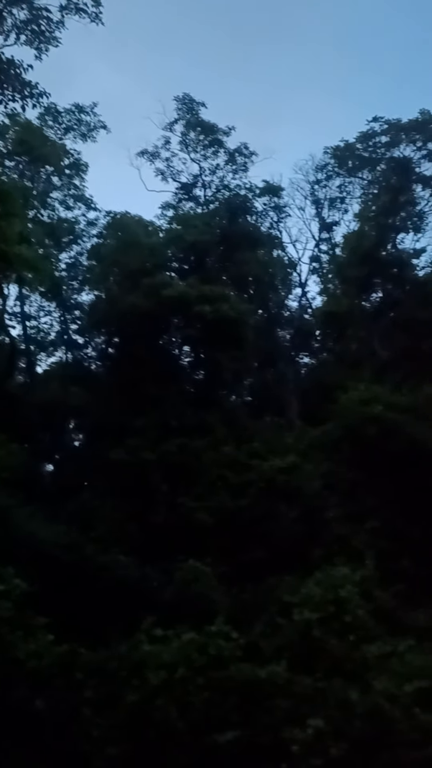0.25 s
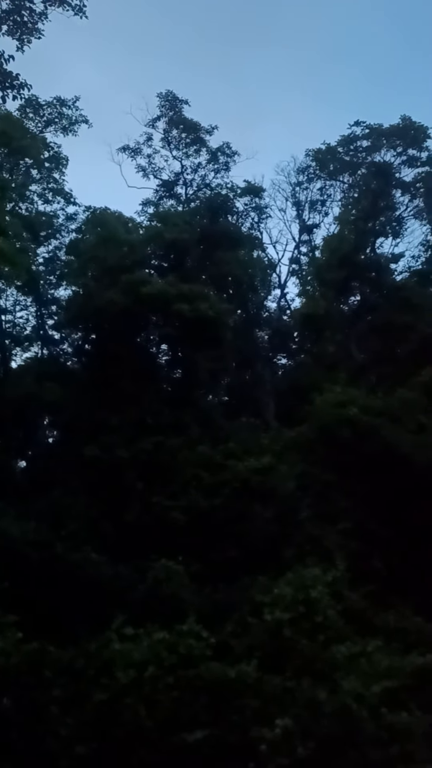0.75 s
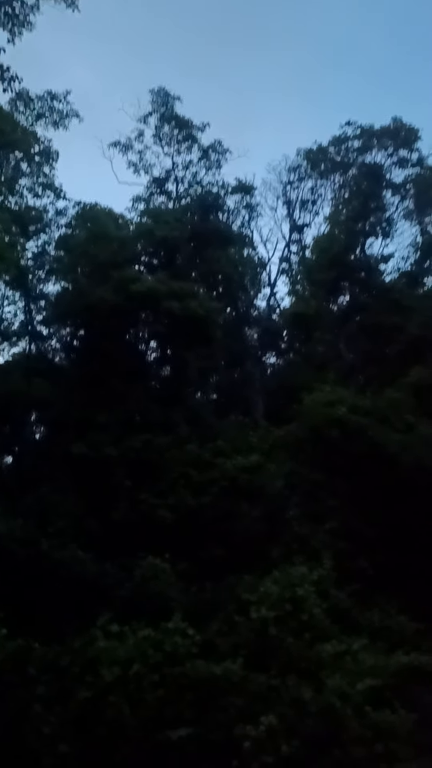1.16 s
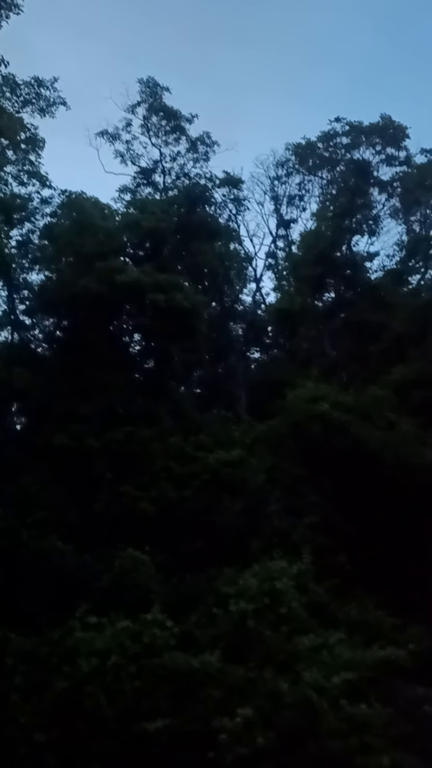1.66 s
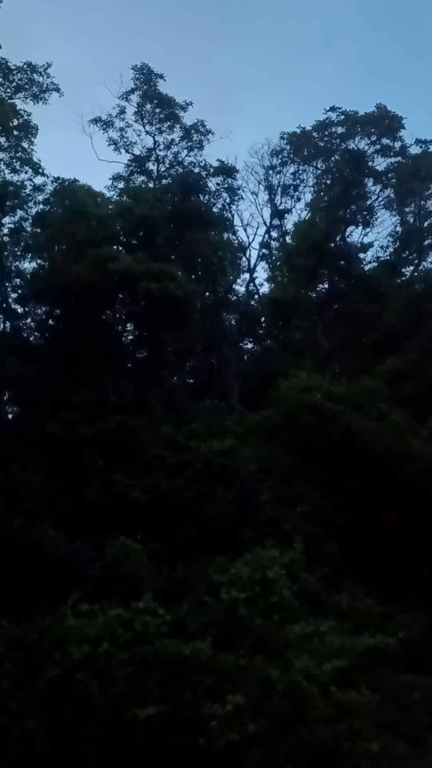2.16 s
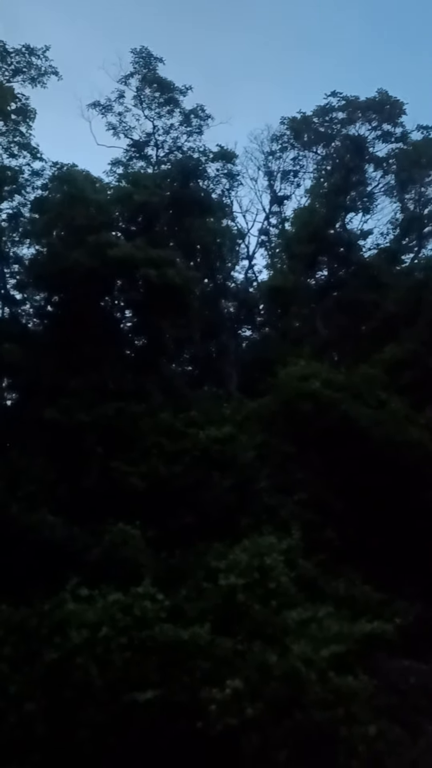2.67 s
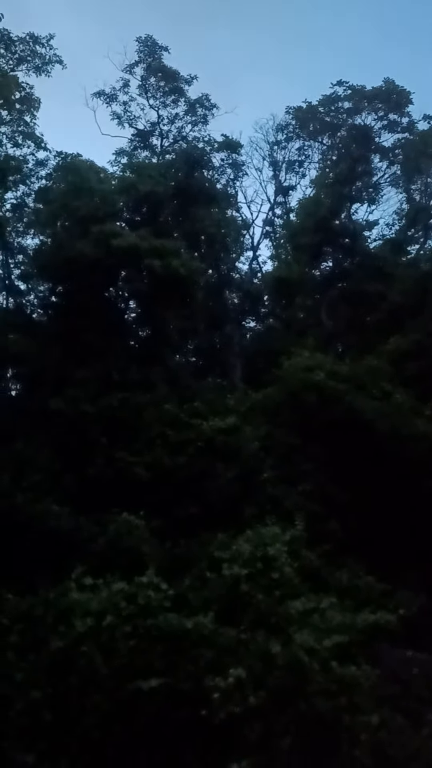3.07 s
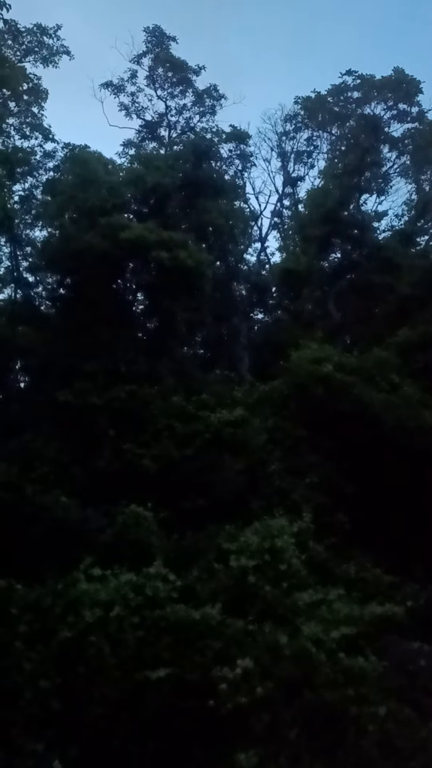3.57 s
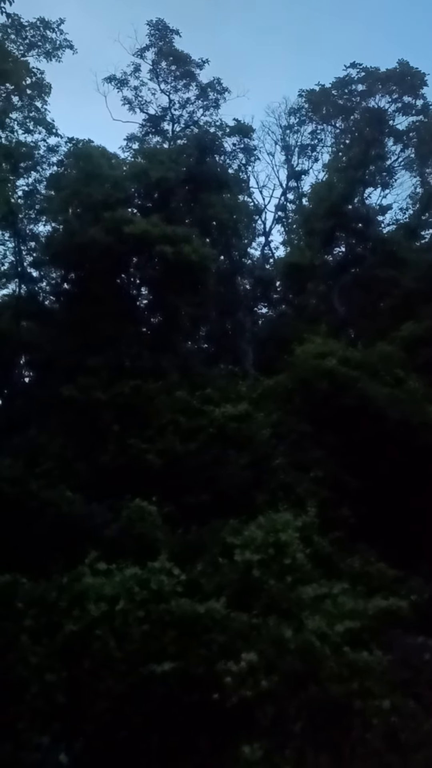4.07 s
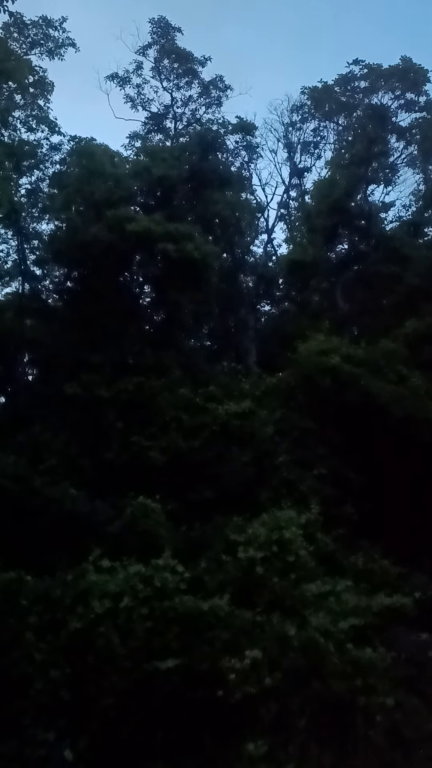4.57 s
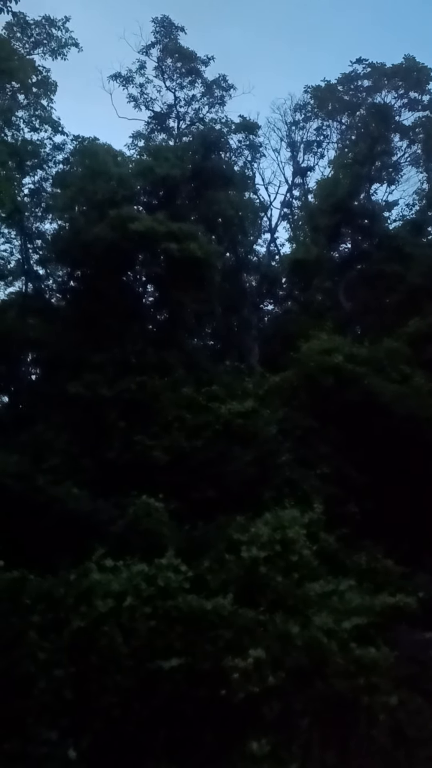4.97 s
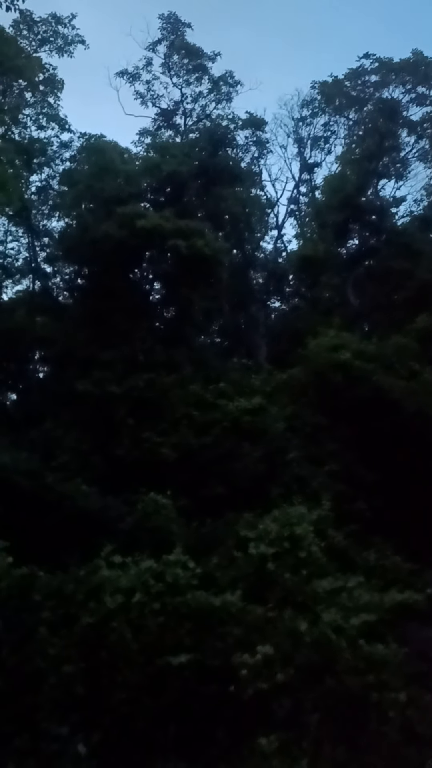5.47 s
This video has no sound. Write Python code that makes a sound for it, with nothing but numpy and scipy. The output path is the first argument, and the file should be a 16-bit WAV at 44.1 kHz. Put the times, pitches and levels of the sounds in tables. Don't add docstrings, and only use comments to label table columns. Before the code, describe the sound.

A handheld phone in a quiet twilight wood picks up weak frog trills, a steady high insect band and distant road rumble. A nightjar sings two brisk phrases, each a throaty chuck, a swooping whistle, a tiny tick and another swoop, about two seconds apart. Trees return a diffuse echo, and the quiet background continues to the end.

```python
import sys
import numpy as np
from scipy import signal
from scipy.fft import rfft, irfft, next_fast_len
from scipy.io import wavfile
from scipy.ndimage import uniform_filter1d, map_coordinates

SR = 44100
rng = np.random.default_rng(int(sys.argv[2]) if len(sys.argv) > 2 else 0)


def unload_wav(signal):
    wavfile.write(
        sys.argv[1],
        SR,
        np.round(np.clip(np.atleast_2d(signal).T, -1, 1) * 32767).astype(np.int16),
    )


def magnitude_from_level(level_db):
    exponent = np.asarray(level_db, float) / 20
    return 10 ** exponent


N = 252687
LEAD_S = 1


def unit(x):
    return x / np.sqrt(np.mean(x ** 2) + 1e-20)


def along(points, hz, axis=1):
    rows = np.array(points)
    return np.interp(np.log(hz + 1), np.log(rows[:, 0] + 1), rows[:, axis])


def curves(rows):
    s, *cols = np.transpose(rows)
    return [np.interp(np.arange(N) / SR, s, c) for c in cols]


def wobble(rate):
    return map_coordinates(rng.standard_normal(int(N * rate / SR) + 4), [np.arange(N) * rate / SR])


def filtered(x, response):
    m = next_fast_len(x.shape[-1] + 8192)
    hz = np.fft.rfftfreq(m, 1 / SR)
    return irfft(rfft(x, m) * response(hz), m)[..., :x.shape[-1]]


def noise(spectrum, channels):
    closed = [(1, -120)] + list(spectrum) + [(spectrum[-1][0] * 1.15, -70)]
    white = rng.standard_normal((channels, N))
    return unit(filtered(white, lambda hz: magnitude_from_level(along(closed, hz))))


# t/s, f/Hz, level/dB
CHUCK_NOTE = [
    (2.2935, 2390, -56),
    (2.2965, 2270, -41),
    (2.305, 1952, -37.5),
    (2.315, 1660, -33),
    (2.324, 1320, -40),
    (2.333, 1150, -58),
]
# t/s, f/Hz, level/dB
WILL_NOTE = [
    (2.604, 1192, -47),
    (2.701, 2335, -36.5),
    (2.738, 1215, -34.5),
    (2.776, 1760, -19),
    (2.797, 1500, -28),
    (2.823, 1615, -26),
    (2.858, 1165, -37),
]
# t/s, f/Hz, level/dB
TICK_NOTE = [
    (2.924, 1257, -55.5),
    (2.93, 1253, -35),
    (2.941, 1227, -30.5),
    (2.948, 1169, -35),
    (2.955, 1137, -55),
]
# t/s, f/Hz, level/dB
WIDOW_NOTE = [
    (2.994, 1138, -38),
    (3.091, 2340, -35.5),
    (3.119, 1325, -32),
    (3.144, 1790, -28),
    (3.171, 1175, -35),
    (3.19, 1120, -34.5),
    (3.207, 925, -48),
    (3.232, 990, -48),
]
# delay t/s, tempo stretch, pitch factor, level/dB
SUNG_PHRASES = [
    (-3.25, 1.007, 1.001, 1.3),
    (0.0, 1.0001, 1.0001, -0.35),
    (2.058, .989, 1.002, -1),
]
# f/Hz, level/dB
THROAT_COLOUR = [(800, -2.5), (1100, 0.04), (2500, 0.13), (3400, -19), (4600, 2.5), (5300, 1), (6800, -5),
                 (8300, -9.5), (10500, -3.5), (13000, -9), (15500, -12)]
# delay t/s, level/dB
TRUNK_ECHOES = [
    (.006, -11.5),
    (.013, -14.5),
    (.023, -14),
    (.034, -15),
]


def nightjar():
    notes = (CHUCK_NOTE, warble(WILL_NOTE, creep=.08), TICK_NOTE, warble(WIDOW_NOTE, creep=.3))
    chuck_scatter_db = 3.5
    total = 0
    for delay, stretch, factor, db in SUNG_PHRASES:
        voiced = []
        for note in notes:
            tone = magnitude_from_level(db) * whistle(note, delay, stretch, factor, brighter_db=12.5, air_db=-24)
            voiced.append(filtered(tone, lambda hz: magnitude_from_level(along(THROAT_COLOUR, hz))))
        chuck, others = voiced[0], sum(voiced[1:])
        song = chuck + others
        spread = magnitude_from_level(chuck_scatter_db) * chuck + others
        sides = rng.normal(0, 3, (len(TRUNK_ECHOES), 2, 1))
        early = sum(magnitude_from_level(level + side) * np.roll(song, round(lag * SR))
                    for (lag, level), side in zip(TRUNK_ECHOES, sides))
        late = magnitude_from_level(-5.5) * echoes(spread, alike=.5, slower=2.68, late_db=-21)
        total = total + song + early + late
    return total[:, LEAD_S * SR:]


def warble(turns, creep):
    climb_power, swell_peak_db, swell_share, swell_ends = 4.0, 9.5, .25, 11.0
    attack_s, release_s, edge_db = .009, .01, -20
    s, hz, db = np.transpose(turns)
    t = np.arange(s[0], s[-1], 1 / 1000)
    place = np.interp(t, s, np.arange(len(s)))
    leg, u = place.astype(int), place % 1
    climbing = leg == 0
    climb = creep * u + (1 - creep) * u ** climb_power
    swing = np.sin(np.pi * u ** .85 / 2) ** 2
    eased = np.where(climbing, climb, swing)
    pitch = hz[leg] + np.diff(hz)[leg] * eased
    swell_db = swell_peak_db * climbing * (1 - np.exp(-u / swell_share)) * (1 - u ** swell_ends)
    edge = np.minimum((t - s[0]) / attack_s, (s[-1] - t) / release_s).clip(0, 1)
    level = db[leg] + np.diff(db)[leg] * np.where(climbing, u, eased) + swell_db + edge_db * (1 - edge)
    return np.transpose([t, pitch, level])


# multiple, level/dB at the top of a glide
WHISTLE_OVERTONES = [(2, -30), (3, -30), (4, -40.5), (5, -40), (6, -44), (7, -45)]


def whistle(note, delay, stretch, factor, brighter_db, air_db):
    s, hz, db = np.transpose(note)
    origin = CHUCK_NOTE[0][0]
    s = LEAD_S + delay + origin + (s - origin) * stretch
    out = np.zeros(N + LEAD_S * SR)
    if s[0] < 0:
        return out
    i = np.arange(round(s[0] * SR), round(s[-1] * SR))
    pitch = uniform_filter1d(np.interp(i / SR, s, hz * factor), size=220, mode="nearest")
    phase = 2 * np.pi * np.cumsum(pitch) / SR
    lift = brighter_db * np.log2(pitch / 2300)
    tone = np.sin(phase)
    for k, level in WHISTLE_OVERTONES:
        tone += magnitude_from_level(level + k * lift) * np.sin(k * phase)
    falling = np.gradient(pitch) < 0
    breath_db = air_db + 5.2 * lift - 12 * falling
    tone += magnitude_from_level(breath_db) * rng.standard_normal(len(i))
    out[i] = np.sqrt(2) * magnitude_from_level(uniform_filter1d(np.interp(i / SR, s, db), size=50)) * tone
    return out


# f/Hz, level/dB
ECHO_COLOUR = [(800, -5), (1200, -3.5), (1750, -1.3), (2300, 2.5), (3300, 4), (4500, 7.5), (7000, -4),
               (8500, 8), (11000, 13), (15000, 9.5)]
# f/Hz, t60/s
WOOD_DECAY = [(900, 0.66), (1400, 0.56), (1800, 0.56), (2400, 0.6), (5000, 0.4), (11000, .36)]
# delay t/s, spread t/s, level/dB
TREE_STANDS = [
    (.085, .012, 3.5),
    (.15, 0.0091, 4.5),
]


def echoes(x, alike, slower, late_db):
    hz, t, z = signal.stft(rng.standard_normal((2, SR * 2)), SR, nperseg=256)
    t60 = along(WOOD_DECAY, hz)[:, None]
    clumps = magnitude_from_level(sum(db * np.exp(-((t - lag) / spread) ** 2) for lag, spread, db in TREE_STANDS))
    decay = magnitude_from_level(-60 * t / t60) + magnitude_from_level(late_db - 60 * t / (slower * t60))
    fade = decay * (1 - np.exp(-t / .008))
    a, b = signal.istft(z * clumps * fade / np.sqrt(t60), SR, nperseg=256)[1]
    turn = np.arccos(np.clip(alike, 0, .55)) / 2
    tail = np.cos(turn) * a + np.sin(turn) * b * np.array([[1], [-1]])
    coloured = filtered(x, lambda f: magnitude_from_level(along(ECHO_COLOUR, f)))
    return signal.fftconvolve(coloured[None], tail / np.linalg.norm(a), axes=1)[:, :len(x)]


# first pulse t/s, end t/s, first period t/s, f/Hz, octave level/dB
FULL_FROGS = [
    (0.388, 1.06, 0.047, 1119, -68.5),
    (1.446, 2.3, .0495, 1125, -64),
    (1.72, 2.3, .051, 1181, -69.5),
]
THIN_FROGS = [
    (.943, 1.45, .0526, 1098, -62),
    (3.587, 4.15, .0525, 1053, -61.5),
    (5.382, 5.72, 0.055, 1097, -63),
]


def near_frogs():
    dry, k = np.zeros(N), np.arange(20)
    for low_db, pulse_s, trills in ((1, .028, FULL_FROGS), (-14, .02, THIN_FROGS)):
        for first, end, period, hz, db in trills:
            times = first + period * k + .0002 * k ** 2
            scatter = rng.standard_normal((len(k), 3))
            swell = np.where(times < end, db + 5 - 6 * np.exp(-k / 1.7), -120)
            pitch = hz * (1 + .006 * scatter[:, 0])
            lower = low_db + swell + 2.0 * scatter[:, 1]
            dry += croaks(times, pitch, lower, multiple=1.04, rise=.36, length=pulse_s)
            dry += croaks(times, pitch, swell + 1.3 * scatter[:, 2], multiple=2, length=pulse_s)
    return dry + magnitude_from_level(-8) * echoes(dry, alike=.55, slower=1.5, late_db=-29.5)


def croaks(times, hz, db, multiple, rise=.15, length=.026, skew=0.69):
    u = np.arange(round(length * SR)) / (length * SR)
    phase = 2 * np.pi * multiple * np.cumsum(hz[:, None] * (1 + rise * (u - .5)), 1) / SR
    shape = magnitude_from_level(db)[:, None] * np.sin(np.pi * u ** skew) ** 2 * np.sin(phase)
    starts = np.round((times[:, None] - .4 * length) * SR).astype(int)
    where = (starts + np.arange(len(u))).clip(0, N)
    return np.bincount(where.ravel(), shape.ravel(), N + 1)[:N]


# t/s, level/dB
FAR_CHORUS = [(0, -68), (.5, -65.5), (.85, -67), (1.2, -76), (1.4, -75), (1.6, -67), (2.1, -66), (2.8, -70),
              (3.6, -67.5), (4.3, -71), (5.0, -69), (5.73, -72)]


def far_frogs(count=1100):
    chance = rng.standard_normal((count, 2))
    times = rng.uniform(0, N / SR, count)
    pitch = 1125 * np.exp(.066 * chance[:, 0].clip(-1.9, 2.2))
    low_db, = curves(FAR_CHORUS)
    octave_db = -70.5 + .55 * (low_db - low_db.mean())
    low, octave = (unit(croaks(times, pitch, 3 * chance[:, 1], multiple=m)) for m in (1.04, 2))
    dry = magnitude_from_level(low_db) * low + magnitude_from_level(octave_db) * octave
    return magnitude_from_level(-6) * dry + magnitude_from_level(-2.5) * echoes(dry, alike=1.0, slower=1.5, late_db=-30)


# t/s, f/Hz, level/dB
FAR_WHISTLE = [
    (1.68, 1620, -92),
    (1.7, 1670, -82),
    (1.725, 1720, -80.5),
    (1.74, 1720, -92),
]


def far_bird():
    call = whistle(FAR_WHISTLE, 0, 1, 1, brighter_db=12, air_db=-40)[LEAD_S * SR:]
    return call + magnitude_from_level(-5) * echoes(call, alike=.4, slower=1.5, late_db=-28.5)


# f/Hz, level/dB per Hz
INSECT_BAND = [(3900, -25), (4200, -9), (4480, -1), (4800, -1), (5200, -5.5), (5400, -14), (5650, -29.5)]


def insects():
    a, b = noise(INSECT_BAND, channels=2)
    level_db = -82 + 1.2 * wobble(35) + .6 * wobble(4.6)
    return magnitude_from_level(level_db) * (.82 * a + 0.64 * b * np.array([[1], [-1]]))


# f/Hz, level/dB per Hz
ROAD_SPECTRUM = [(25, -43), (40, -34), (50, -17), (62, -4), (80, -5.5), (100, -1), (120, 1), (178, -13),
                 (250, -11), (335, -23), (600, -29.5), (950, -24), (1350, -31)]
# f/Hz, coherence, left-right level/dB
ROAD_AT_PORTS = [(60, .9, 3), (150, 0.85, 3), (300, .58, 5.5), (700, .48, 4)]


def road():
    turn = lambda hz: np.arccos(np.clip(along(ROAD_AT_PORTS, hz), 0, 1)) / 2
    shares = lambda hz: np.array([np.cos(turn(hz)), np.sin(turn(hz))])
    mid, side = filtered(noise(ROAD_SPECTRUM, channels=2), shares)
    lean = lambda hz: magnitude_from_level(along(ROAD_AT_PORTS, hz, axis=2) * np.array([[.5], [-.5]]))
    rumble = filtered(np.array([mid + side, mid - side]), lean)
    return traffic() * magnitude_from_level(0.34 + 1.2 * wobble(15)) * rumble


# t/s, peak level/dB, fade rate/(dB per s)
TRAFFIC_SWELLS = [(0.0, -56, 50), (.15, -61, 12), (.73, -59, 40), (1.1, -62, 6), (2.06, -63, 30),
                  (2.55, -64, 5), (2.95, -59, 25), (3.83, -62, 45), (4.23, -64, 60), (4.43, -62.5, 25),
                  (4.85, -59.5, 14)]


def traffic():
    t = np.arange(N) / SR
    energy = magnitude_from_level(-69 - .6 * t) ** 2
    for s, db, fade in TRAFFIC_SWELLS:
        rise = np.exp(-((s - t).clip(0) / .06) ** 2)
        energy += magnitude_from_level(db - fade * (t - s).clip(0)) ** 2 * rise
    return np.sqrt(energy)


# f/Hz, left-right level/dB, left lag/rad
PORT_DIFFERENCES = [(850, 1.5, 0.9), (1150, 0.5, .5), (1650, -3, 1.43), (2220, -1, -1.0), (3370, 0.6, -2.5),
                    (4830, -6, -3), (7000, -5, -2.5), (10980, -8, -2.5), (15000, -3.5, -2)]


def ports(x):
    def tilt(hz):
        return magnitude_from_level(along(PORT_DIFFERENCES, hz) / 2) * np.exp(-.5j * along(PORT_DIFFERENCES, hz, axis=2))
    return filtered(x, lambda hz: np.array([tilt(hz), 1 / tilt(hz)]))


def scene():
    frogs = magnitude_from_level([[-1.5], [1.5]]) * (near_frogs() + far_frogs())
    return ports(nightjar() + frogs + far_bird() + insects()) + road()


# t/s, half length t/s, level/dB
SLEEVE_BRUSH = [
    (2.535, .045, -82),
]


def sleeve():
    t = np.arange(N) / SR
    brush = sum(magnitude_from_level(db) * np.exp(-((t - s) / half) ** 2) for s, half, db in SLEEVE_BRUSH)
    return brush * noise([(7000, -30), (10000, -6), (13500, 0.1), (15500, -4)], channels=2)


# f/Hz, level/dB per Hz
MICROPHONE_HISS = [(300, -2), (800, -3), (1600, -4.5), (2600, -7.5), (3200, -10), (6000, -18), (8000, -16),
                   (12000, -12), (14500, -12), (15700, -14.5)]


def hiss():
    return magnitude_from_level(-82) * noise(MICROPHONE_HISS, channels=2)


def low_pass(x):
    return signal.sosfilt(signal.butter(12, 15720, fs=SR, output="sos"), x)


def record(dry):
    mix = dry + hiss() + sleeve()
    return low_pass(mix)


dry = scene()
out = record(dry)
unload_wav(out)
```